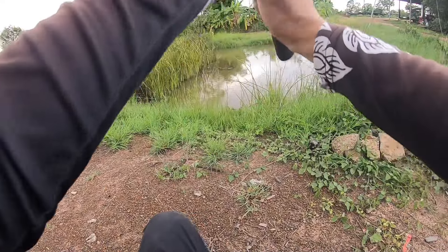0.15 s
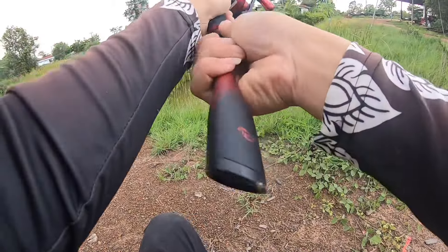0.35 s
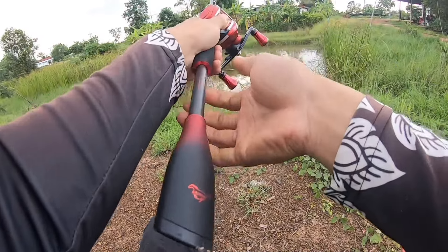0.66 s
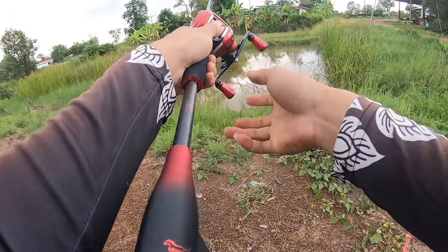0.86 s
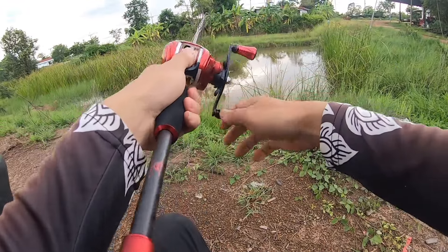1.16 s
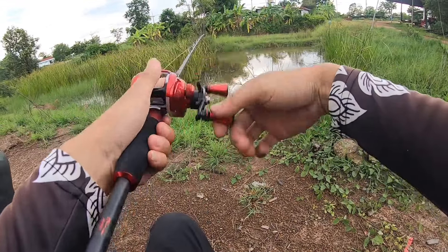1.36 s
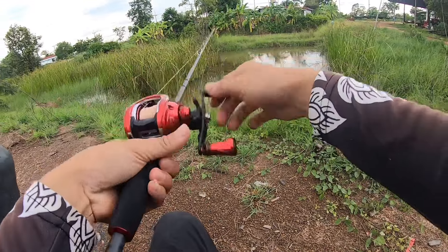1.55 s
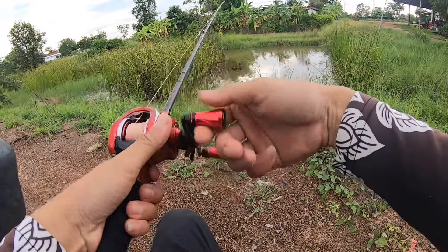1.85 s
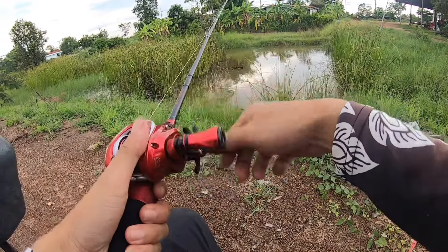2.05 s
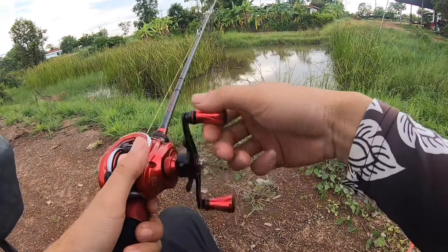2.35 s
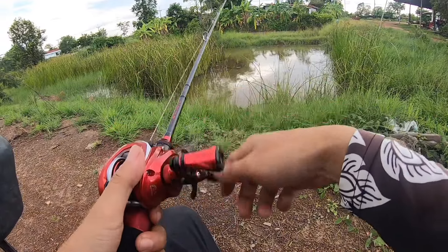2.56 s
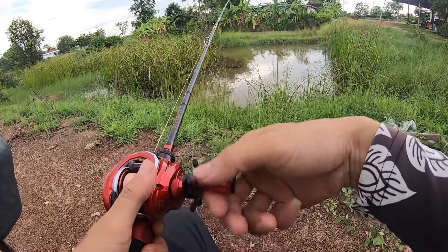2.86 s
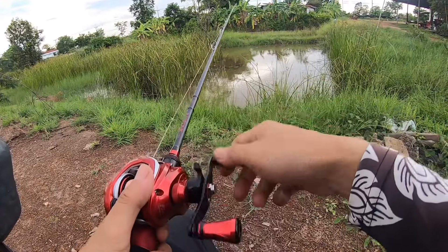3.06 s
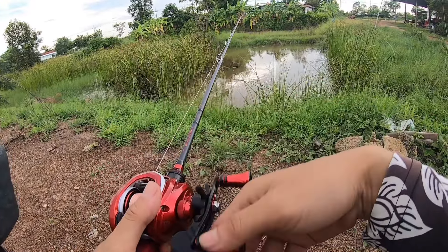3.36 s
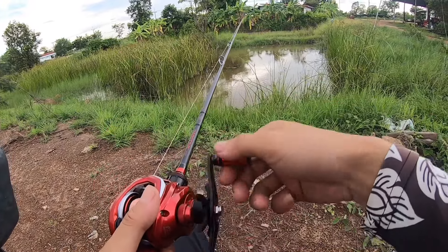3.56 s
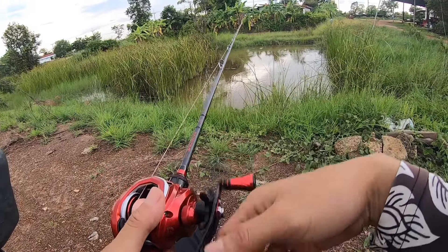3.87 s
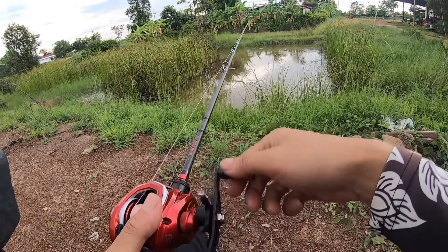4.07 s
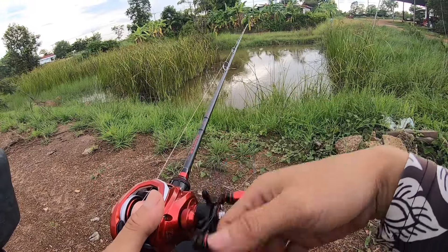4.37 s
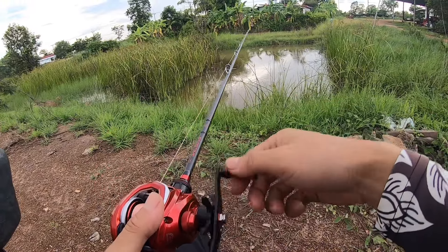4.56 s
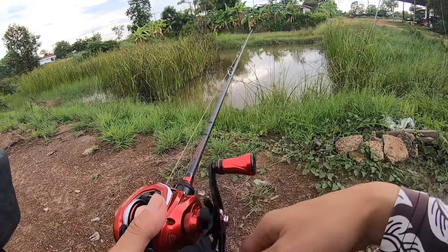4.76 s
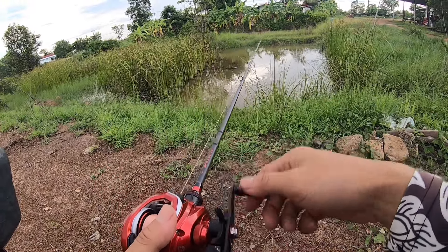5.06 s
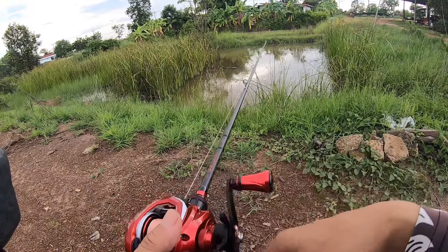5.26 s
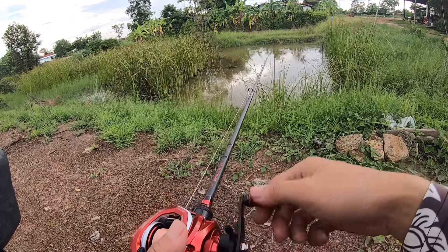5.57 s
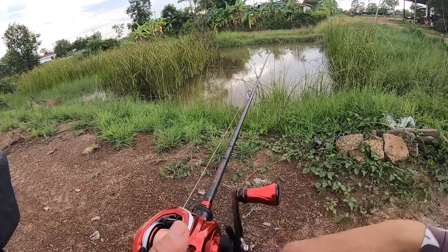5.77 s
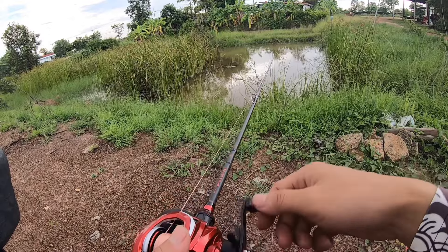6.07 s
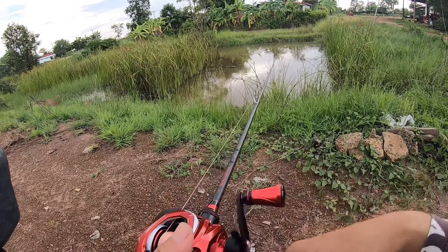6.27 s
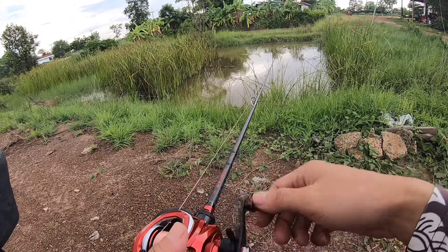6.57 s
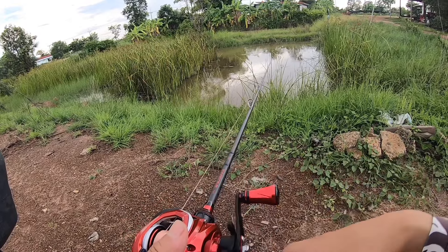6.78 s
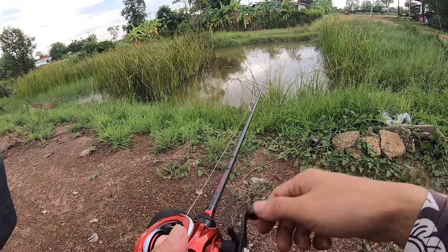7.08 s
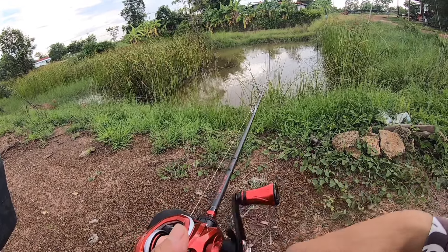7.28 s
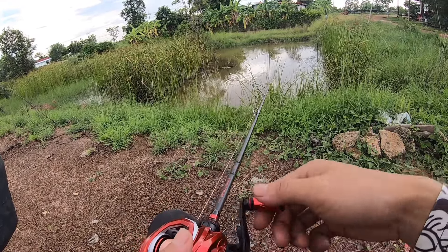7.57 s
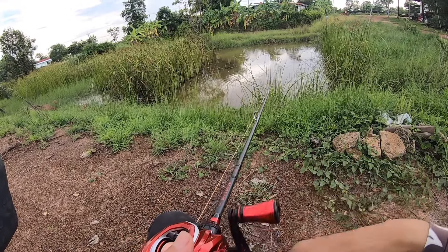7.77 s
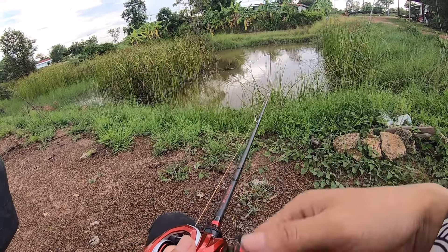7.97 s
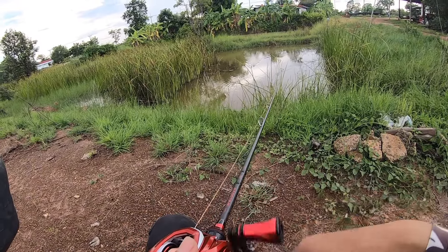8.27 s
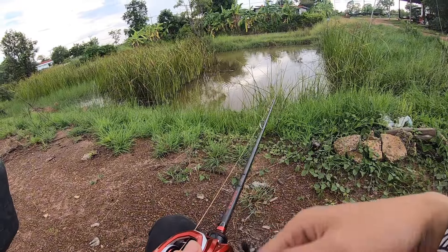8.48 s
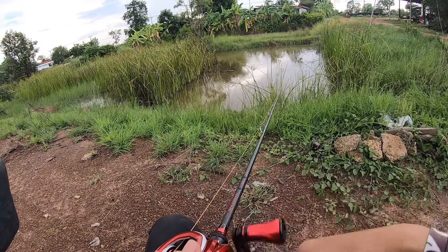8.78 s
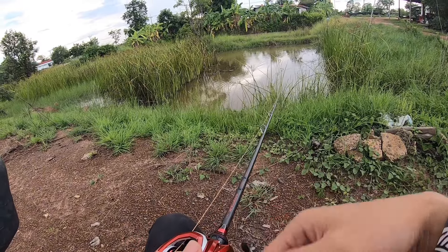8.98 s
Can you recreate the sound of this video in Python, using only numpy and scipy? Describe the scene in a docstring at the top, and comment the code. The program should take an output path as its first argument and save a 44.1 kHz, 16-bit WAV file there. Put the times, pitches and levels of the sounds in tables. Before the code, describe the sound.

A fishing rod swishes, the spool whirrs down as line hisses out, a sharp clutch clack, then faint winding ticks amid pond birds, insects and wind.

```python
"""Beside a pond, an angler casts with a baitcasting reel, heard from a camera on the chest.
The rod swishes and filtered noise with harmonics of a slowing spool whirrs, while line hisses out.
The crank snaps the clutch in: damped frame modes ring, then sparse gear ticks follow the winding.
Gliding tones and partial stacks make small birds in the reeds; pulsed tones make a buzzing insect.
Low coloured noise is wind on the microphone; unsteady low sines are a far engine and a hum."""
import sys
import numpy as np
from scipy import signal
from scipy.fft import rfft, irfft
from scipy.io import wavfile
from scipy.ndimage import uniform_filter1d

SR = 44100
rng = np.random.default_rng(int(sys.argv[2]) if len(sys.argv) > 2 else 0)


def wrap_up_sound(samples):
    """Save the sound to the file named by the first command line argument, as 16-bit audio."""
    columns = np.atleast_2d(samples).T
    # keep every value between -1 and 1, then stretch to whole-number steps
    tamed = np.clip(columns, -1, 1)
    steps = np.round(tamed * 32767).astype(np.int16)
    wavfile.write(sys.argv[1], SR, steps)


N = 402633
T = np.arange(N) / SR
TOP_HZ = 15850  # upper limit of the recorder


def undb(db):
    """Decibels to amplitude gain."""
    return 10 ** (np.asarray(db) / 20)


def unit(x):
    """Scale to rms 1."""
    return x / np.sqrt(np.mean(x ** 2) + 1e-18)


def curve(rows):
    """Interpolate (time_s, value) rows at every sample."""
    time_s, value = np.transpose(rows)
    return np.interp(T, time_s, value)


def over_bins(points):
    """Interpolate (freq_hz, value) points over log frequency at every FFT bin."""
    freq_hz, value = np.transpose(points)
    bin_hz = np.arange(N // 2 + 1) * SR / N
    return np.interp(np.log(bin_hz + 1), np.log(freq_hz + 1), value)


def colour(x, points):
    """Weight a spectrum by (freq_hz, gain_db) points, closed an octave beyond each end; rms 1."""
    closed = [(points[0][0] / 2, -90), *points, (points[-1][0] * 2, -90)]
    gain = undb(over_bins(closed))
    return unit(irfft(rfft(x) * gain, N))


def noise(channels=1):
    """Independent white noise in each channel."""
    return rng.standard_normal((channels, N))


def half_shared_noise():
    """Stereo noise: a common part plus independent parts at half amplitude."""
    return noise() + noise(channels=2) / 2


def walk(rate_hz):
    """Smooth random modulation of rms 1, redrawn rate_hz times a second."""
    hold = max(int(SR / rate_hz), 1)
    steps = np.repeat(rng.standard_normal(N // hold + 1), hold)[:N]
    return unit(uniform_filter1d(steps, hold))


def quaver(count, size):
    """Smooth random modulation of rms 1 for a short sound, smoothed over size samples."""
    window = signal.windows.hann(size)
    return unit(signal.fftconvolve(rng.standard_normal(count), window, "same"))


def hump(peak_s, rise_s, fall_s):
    """Gaussian rise and fall reaching 1 at peak_s."""
    return np.exp(-((T - peak_s) / np.where(T < peak_s, rise_s, fall_s)) ** 2)


def humps(rows):
    """Summed gain of (peak_s, rise_s, fall_s, level_db) humps."""
    return sum(undb(db) * hump(peak_s, rise_s, fall_s) for peak_s, rise_s, fall_s, db in rows)


def add(out, start_s, x):
    """Mix a short sound in at start_s."""
    i = max(int(start_s * SR), 0)
    out[..., i:i + x.shape[-1]] += x[..., :max(N - i, 0)]


def place(x, pan_db, lead_s=0):
    """Feed both ports: left louder than right by pan_db and earlier by lead_s."""
    spec = rfft(x) * np.ones((2, 1))
    bin_hz = np.arange(N // 2 + 1) * SR / N
    spec[0] *= np.exp(2j * np.pi * bin_hz * lead_s)
    return irfft(spec, N) * undb(np.array([[pan_db], [-pan_db]]) / 2)


def scatter(x, t60, wet_db):
    """Diffuse return from surroundings: an independent decaying noise tail for each port."""
    t = T[:SR // 2]
    tail = rng.standard_normal((2, len(t))) * np.exp(-np.log(1000) * t / t60)
    tail /= np.sqrt(np.sum(tail ** 2, axis=1, keepdims=True))
    return undb(wet_db) * signal.fftconvolve(np.atleast_2d(x), tail, axes=1)[:, :N]


def surround(points):
    """Ambient noise whose correlation and balance between the ports depend on frequency."""
    # microphone ports: freq_hz, correlation [-1..1], left_minus_right_db
    ports = np.array([(60, .92, 4.3), (150, .8, 6), (300, -.45, 1), (680, -.78, -.5), (1400, -.68, 1.5),
                      (3100, .4, 0), (6800, -.15, -4)])
    mid, side = rfft(colour(noise(channels=2), points))
    likeness, balance_db = over_bins(ports[:, :2]), over_bins(ports[:, ::2])
    sign = np.array([[1], [-1]])
    side = side * np.sqrt((1 - likeness) / (1 + likeness))
    return irfft((mid + sign * side) * undb(sign * balance_db / 2), N)


def running(attack_s):
    """Spool run: attack at the release, hold through the flight, fade under the thumb."""
    release_s, stop_s, thumb_s = 0.3, 1.33, 0.1
    attack, fade = (T - release_s) / attack_s, (stop_s - T) / thumb_s
    return np.clip(np.minimum(attack, fade), 0, 1)


def cast():
    """The lure flings the spool up to speed, braking slows it; rod and running line hiss as air noise."""
    # spool speed: time_s, turns_per_s
    spool = [(.3, 335), (.44, 372), (.63, 362), (.78, 272), (1.1, 190), (1.33, 110)]
    # spinning reel spectrum: freq_hz, gain_db
    reel_colour = [(1200, -36), (1700, -9.5), (2450, -1.5), (2900, -9.5), (3400, -4), (3850, -2),
                   (4200, -9), (5300, -22)]
    # running line spectrum: freq_hz, gain_db
    line_colour = [(3000, 1), (5000, -0.5), (6500, 7), (8500, 3), (9300, 2.5), (10200, 5.5), (11300, 2),
                   (12800, 5.5), (15800, -5)]
    # swish spectrum: freq_hz, gain_db
    swing_colour = [(400, -7), (560, -5), (1200, -7.5), (2300, 3), (5200, -11), (7000, -11), (15000, -28)]
    # line whipping off, rod tip, then whole rod: peak_s, rise_s, fall_s, relative_db
    swishes = [(.3235, 0.0062, 0.0054, -18), (.388, 0.013, 0.012, -29), (.4, 0.083, 0.041, -23.5)]
    rush_db, rush_power, line_db = -30, 1.54, -37.5  # rush level at top speed; its growth with speed
    spin_up_s, taut_s = 0.11, 0.023  # attacks of reel and line

    speed = curve(spool)
    turns = np.cumsum(speed * (1 + .016 * walk(110) + .005 * walk(22))) / SR

    # spool harmonics flicker in the rush as the line peels off
    whirr = 0
    for k in range(4, 22):
        whirr = whirr + walk(80) * np.sin(2 * np.pi * (k * turns + rng.random()))
    rush = colour(unit(whirr) / 2 + noise()[0], reel_colour)
    rush = rush * undb(rush_db) * (speed / speed.max()) ** rush_power
    rush = rush * undb(1.5 * walk(300))  # loose coils flick the frame: rasp

    # bearing whine: narrow band at ten times spool speed, weighted by the frame response
    whine_phase = 2 * np.pi * 10 * turns
    whine = unit(walk(370) * np.sin(whine_phase) + walk(370) * np.cos(whine_phase))
    frame_db = np.interp(10 * speed, *np.transpose(reel_colour))
    patchy_db = 1.1 * walk(45)  # line peels off unevenly
    reel = rush + whine * undb(-31.7 + patchy_db + frame_db)

    # line slaps the guides once a turn
    slap = (1 + 0.17 * np.sin(2 * np.pi * turns)) * undb(1.5 * walk(89.8))
    line = colour(noise(channels=2), line_colour) * slap
    line = line * undb(line_db + 2.3 * walk(10.7)) * running(taut_s)

    swish = colour(half_shared_noise(), swing_colour) * humps(swishes) * undb(1.8 * walk(260))
    return place(reel * running(spin_up_s), 0.98) + place(line, -4.0) + place(swish, 3.6)


def clutch():
    """Short clutch and gear contacts crack and excite damped modes of the reel frame."""
    # contacts: start_s, level_db, top_pitch_hz, contact_s, crack_db (against the ring)
    clicks = [(1.356, -16, 3400, 0.0005, -30), (1.3958, -2, 4220, 0.00038, -4.5),
              (1.398, -9, 4140, 0.0006, -20), (1.413, -6, 5630, 0.00032, -14),
              (1.4143, -2, 10000, 0.00021, -10.5), (1.523, -23, 8900, .0006, -14),
              (1.823, -20.5, 6200, 0.00035, -6.5), (2.174, -22.5, 4800, .0003, -14)]
    # frame modes: freq_hz, level_db, t60_s
    reel_modes = [(1970, -18, 0.043), (2350, -15, 0.018), (2680, -7, 0.0095), (3250, -4.5, 0.01),
                  (3950, 1.5, 0.0093), (5040, 0, .0075), (6370, 0, 0.0082), (6900, -1, 0.0058),
                  (9000, -2, 0.0076)]
    crack_decay_s = 0.0013
    out, t = np.zeros(N), T[:SR // 20]
    hz, db, t60_s = np.transpose(reel_modes)[:, :, None]
    decay = np.exp(-np.log(1000) * t / t60_s)
    for start_s, level_db, top_hz, contact_s, crack_db in clicks:
        # a dull contact barely excites modes above its top pitch
        weight = undb(db) / np.sqrt(1 + (hz / top_hz) ** 20)
        # loose parts chatter, blurring each mode into a clack
        chatter = np.array([.6 * quaver(len(t), size=60) for _ in hz])
        # neighbouring modes start in opposite directions: dense snap between them
        start = np.pi * np.arange(len(hz))[:, None] - chatter[:, :1] / 2
        modes = weight * np.sin(2 * np.pi * hz * t + start + chatter) * decay
        ring = modes.sum(axis=0) / np.linalg.norm(weight)

        crack = undb(crack_db) * rng.standard_normal(len(t)) * np.exp(-t / crack_decay_s)
        lowpass = signal.butter(2, min(2.4 * top_hz, TOP_HZ), fs=SR, output="sos")
        crack = signal.sosfilt(lowpass, crack)
        onset = 1 - np.exp(-(t / contact_s) ** 2)
        add(out, start_s, undb(level_db) * (ring + crack) * onset)
    return place(out, -1.5, lead_s=.00002) + scatter(out, t60=.055, wet_db=-9)


def crank():
    """Handle and gears tick at random while winding, and scrape where the hand presses harder."""
    # grit spectrum: freq_hz, gain_db
    grit_colour = [(2000, 0), (3000, 3), (3800, 6), (5000, -6), (7000, -17), (10000, -13), (13000, -45)]
    # handle scrapes: peak_s, rise_s, fall_s, level_db
    scrapes = [(1.59, 0.068, 0.31, -47), (2.29, 0.052, 0.074, -46.5), (3.7, 0.022, 0.033, -45),
               (7.23, .04, 0.059, -49)]
    winding_start_s, winding_db, ticks_per_s = 1, -56, 600
    size, chance = rng.standard_normal(N), rng.random(N)
    grit = colour(size * (chance < ticks_per_s / SR), grit_colour)
    grit = grit * (undb(winding_db) * (T > winding_start_s) + humps(scrapes))
    return place(grit, -1.5) + scatter(grit, t60=.055, wet_db=-8)


def sleeves():
    """Cloth rubs near the camera as the arms swing and come down: unsteady coloured noise."""
    # arm movements: peak_s, rise_s, fall_s, relative_db
    movements = [(.28, 0.27, 0.076, -44), (1.4, 0.64, 0.49, -46)]
    # cloth spectrum: freq_hz, gain_db
    sleeve_colour = [(320, 3), (430, -6.5), (750, -11)]
    return colour(half_shared_noise(), sleeve_colour) * humps(movements) * undb(4.4 * walk(39.5))


def note(length_s, pitches_hz):
    """Phase, swell and pitch of a bird note gliding on a parabola through three pitches."""
    u = np.linspace(0, 1, int(length_s * SR))
    hz = np.polyval(np.polyfit([0, .5, 1], pitches_hz, 2), u)
    return 2 * np.pi * np.cumsum(hz) / SR, np.abs(np.sin(np.pi * u)), hz


def chirping_birds():
    """Nasal chirps: unsteady partials, clear or hoarse, arch and drop under a falling throat resonance."""
    # chirps: start_s, length_s, relative_db
    chirps = [(1.085, 0.05, -37), (1.22, 0.063, -35), (1.912, 0.043, -37), (2.003, 0.06, -36.5),
              (2.6, .045, -43), (2.69, 0.053, -37.5), (3.315, 0.046, -38.5), (3.415, 0.054, -37.5),
              (3.533, 0.066, -34), (3.692, 0.067, -34.5), (3.815, 0.065, -36), (3.957, 0.049, -35.5),
              (4.398, 0.053, -40), (4.671, 0.057, -38), (4.8, 0.075, -37), (5.103, 0.049, -39),
              (5.23, 0.052, -47), (5.94, 0.062, -42), (6.054, 0.077, -37.5), (6.31, 0.062, -46),
              (6.492, 0.054, -41), (6.59, 0.057, -39), (6.725, 0.058, -39.5), (6.98, 0.041, -44),
              (7.085, 0.066, -40), (7.39, 0.06, -41), (7.503, .065, -38), (7.57, 0.049, -44),
              (7.645, 0.062, -38), (7.835, 0.037, -45), (8.54, 0.05, -38), (8.64, 0.057, -37.5),
              (8.79, 0.064, -39.5)]
    out = np.zeros(N)
    k = np.arange(5, 17)[:, None]  # partial numbers
    for start_s, length_s, db in chirps:
        pitches_hz = np.array([440, 448, 392]) * rng.uniform(.8, 1.3)
        pitches_hz = pitches_hz * (1 + .03 * rng.standard_normal(3))
        phase, swell, hz = note(length_s, pitches_hz)
        # unsteady vibration smears the partials and breaks up the note
        phase = phase + rng.uniform(.035, .115) * quaver(len(hz), size=180)
        swell = swell * undb(3 * quaver(len(hz), size=240) - 1)

        throat_hz = np.linspace(rng.uniform(3650, 4050), rng.uniform(3150, 3350), len(hz))
        throat = np.exp(-((k * hz - throat_hz) / 430) ** 2)
        # a second resonance fades out over the note
        opening = np.linspace(1, 0, len(hz)) ** 3 * np.exp(-((k * hz - 5050) / 300) ** 2)
        partials = (throat + opening) * np.sin(k * phase + 2 * np.pi * rng.random(k.shape))
        add(out, start_s, undb(db) * swell * unit(partials.sum(axis=0)))
    return place(out, -1.2, lead_s=.000013) + scatter(out, t60=.35, wet_db=-7)


def scolding_birds():
    """Sharp chips: two steep down-sweeps, the second lower, with random phase for a grainy voice."""
    # chips: start_s, relative_db, base_pitch_hz (of the first sweep)
    chips = [(1.641, -35.5, 5800), (2.33, -37, 5900), (3.687, -32.5, 5000), (4.385, -36, 4990),
             (4.55, -33, 5700), (5.33, -39, 5500), (6.451, -34.5, 5900), (7.204, -34, 5700),
             (8.309, -34.5, 5870), (8.918, -34, 5780)]
    sweep_s, gap_s, second_pitch_ratio = .021, .026, .84  # gap from start to start
    out = np.zeros(N)
    for start_s, db, top_hz in chips:
        for delay_s, base_hz in ((0, top_hz), (gap_s, second_pitch_ratio * top_hz)):
            pitches_hz = base_hz * np.array([1, .88, .72]) * (1 + .025 * rng.standard_normal(3))
            phase, swell, _ = note(sweep_s, pitches_hz)
            rasp = 1.05 * quaver(len(phase), size=90)
            add(out, start_s + delay_s, undb(db) * swell * np.sin(phase + rasp))
    out *= undb(3.5 * walk(300) - 1)
    return place(out, -1.2, lead_s=.00007) + scatter(out, t60=.5, wet_db=1)


def whistling_birds():
    """Fluttering whistles and short peeps are gliding sines; the long ones linger in the trees."""
    # whistles: start_s, length_s, start_hz, middle_hz, end_hz, relative_db
    whistles = [(1.799, 0.12, 5140, 4880, 4940, -42), (2.468, 0.098, 2445, 2490, 2476, -35),
                (2.589, .07, 5350, 4580, 4600, -34.5), (2.955, .07, 5350, 5200, 5300, -42),
                (3.381, 0.094, 4460, 4930, 5000, -35.5), (4.086, 0.059, 4830, 4980, 4850, -37.5),
                (4.437, 0.024, 6300, 6150, 5600, -40), (4.618, 0.076, 4200, 4050, 4180, -34.5),
                (6.395, .032, 5750, 6170, 5650, -37), (7.697, 0.029, 5800, 6050, 5360, -38)]
    out, far = np.zeros((2, N))
    for start_s, length_s, *pitches_hz, db in whistles:
        phase, swell, _ = note(length_s, pitches_hz)
        flutter = .25 * quaver(len(phase), size=260)
        whistle = undb(db) * np.sqrt(swell) * np.sin(phase + flutter)
        add(out, start_s, whistle)
        if length_s > .04:
            add(far, start_s, whistle)
    out *= undb(1.9 * walk(200) - 1)
    return place(out, -3, lead_s=.00005) + scatter(far, t60=.95, wet_db=-3.5)


def insects():
    """Wing strokes pulse a rising tone in each near chirp; a narrow noise band shimmers further off."""
    # trilling or idling bouts: first_chirp_s, end_s, spacing_s, relative_db
    bouts = [(.0, .27, .078, -43), (.55, 1.45, .078, -41.5), (1.645, 3.15, .243, -39),
             (3.28, 3.7, .155, -39), (3.781, 8.13, .0786, -37)]
    stroke_hz, low_hz, rise_hz = 112, 7265, 160
    buzz_s, buzz_share = 0.079, 0.75  # chirp length, or share of the spacing when hurried
    out = np.zeros(N)
    for first_s, end_s, spacing_s, db in bouts:
        length_s = min(buzz_s, buzz_share * spacing_s)
        t = T[:int(length_s * SR)]
        edges = signal.windows.tukey(len(t), .1)
        for start_s in np.arange(first_s, end_s, spacing_s):
            rate_hz = stroke_hz * (1 + 0.06 * rng.standard_normal())
            strokes = np.sin(np.pi * rate_hz * t) ** 2
            hz = low_hz + rise_hz * t / length_s + 20 * rng.standard_normal()
            tone = np.sin(2 * np.pi * np.cumsum(hz) / SR)
            add(out, start_s, undb(db + rng.standard_normal()) * strokes * edges * tone)
    near = out * undb(2.0 + 0.21 * walk(130))

    chorus_colour = [(6600, -16), (7250, 5), (7650, -0.5), (7800, -2.0), (8100, -35)]  # freq_hz, gain_db
    chorus = colour(noise(channels=2), chorus_colour) * undb(-48.0 + 2 * walk(100))
    near_tail = scatter(near, t60=.1, wet_db=-10)
    return place(near, -6, lead_s=.000037) + near_tail + place(chorus, -4)


def gust_db():
    """Gust lift relative to the steady breeze, in dB."""
    # gusts: peak_s, half_length_s, lift_db
    gusts = [(.38, 0.34, 1.3), (1.27, 0.043, 2.9), (2.55, 0.0095, 4.2), (2.87, 0.05, 1.7),
             (4.25, 0.066, 1.9), (5.42, 0.049, 3.6), (7.28, 0.14, 1.7), (8.55, 0.11, 2.2)]
    return sum(db * hump(peak_s, half_s, half_s) for peak_s, half_s, db in gusts)


def wind():
    """Turbulence buffets the microphone as low noise, over the soft wash of open air and the microphone's own
    faint hiss."""
    # rumble spectrum: freq_hz, gain_db
    wind_colour = [(14, -14), (36, -2.5), (65, 0.5), (150, -3), (200, -11.5), (250, -17.5), (320, -33),
                   (480, -47.5)]
    # open air level: time_s, relative_db
    air_level = [(0, -46.5), (.5, -43), (2, -44.5), (7.9, -46), (8.6, -44.5), (9.1, -46)]
    # open air spectrum: freq_hz, gain_db
    air_colour = [(300, 0), (480, -8), (760, -4), (980, -9), (1330, -7), (1900, -12.5), (3300, -11.5),
                  (6500, -23)]
    breeze_db, shelter_share, shelter_s = -21, 0.45, 0.51

    rumble = place(surround(wind_colour), 0, lead_s=0.00026) * undb(breeze_db + gust_db())
    # raised arms shelter the microphone at first: duller rumble
    highpass = signal.butter(2, 110, "highpass", fs=SR, output="sos")
    upper = signal.sosfiltfilt(highpass, rumble)
    rumble = rumble - shelter_share * hump(0, shelter_s, shelter_s) * upper

    air = surround(air_colour) * undb(curve(air_level) + 4.5 + walk(7.8) / 2)
    hiss = colour(noise(channels=2), [(5000, 1.0), (8500, 2.5), (12500, -1.0), (14000, -15)])
    return rumble + air + place(hiss * undb(-60.0), -4.5)


def grass():
    """A low rustle swells late in the grass and reeds: coloured noise with an uneven level."""
    # rustle: peak_s, rise_s, fall_s, relative_db
    rustle = [(8.75, 0.68, 0.93, -44)]
    # rustle spectrum: freq_hz, gain_db
    rustle_colour = [(400, -10), (750, -1), (1300, -10.5), (2200, -28)]
    return colour(half_shared_noise(), rustle_colour) * humps(rustle) * undb(1.5 * walk(20))


def drone():
    """A far engine and faint hum: sines of unsteady level and phase, swelling with the gusts."""
    # engine and hum partials: freq_hz, relative_db
    partials = [(70.2, -21.5), (105.6, -26), (143, -42.5), (179.8, -39.5), (300, -49), (420, -53.5)]
    tones = 0
    for hz, db in partials:
        tones = tones + undb(db + 2.22 * walk(4)) * np.sin(2 * np.pi * hz * T + 0.17 * walk(1.9))
    return place(tones, 4.4, lead_s=0.00027) * undb(3.04 * gust_db() - 1.23)


def scene():
    """Sum of the reel close by and the pond all around."""
    angler = cast() + clutch() + crank() + sleeves()
    birds = chirping_birds() + scolding_birds() + whistling_birds()
    return angler + birds + insects() + wind() + grass() + drone()


def record(dry):
    """The camera clips at full scale, then a steep low-pass cuts the top."""
    lowpass = signal.ellip(10, .2, 80, TOP_HZ, fs=SR, output="sos")
    return signal.sosfilt(lowpass, np.clip(dry, -1, 1))


dry = scene()
out = record(dry)
wrap_up_sound(out)
```